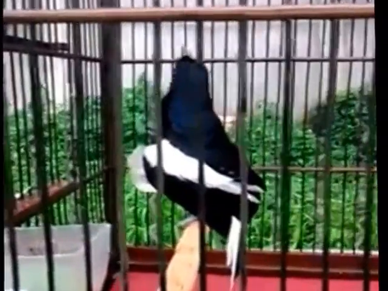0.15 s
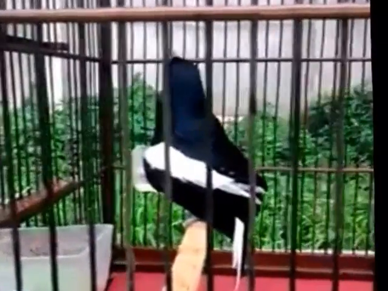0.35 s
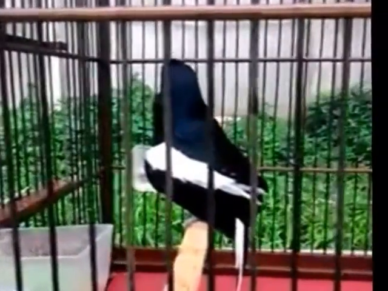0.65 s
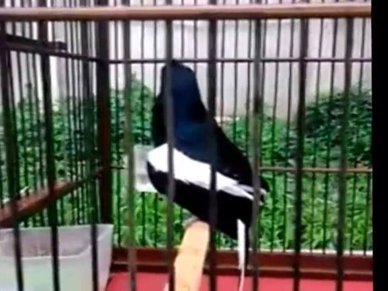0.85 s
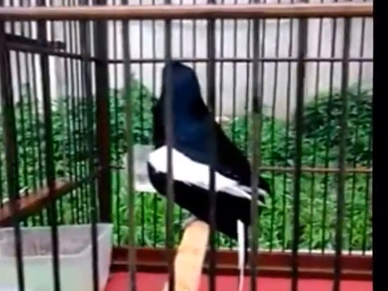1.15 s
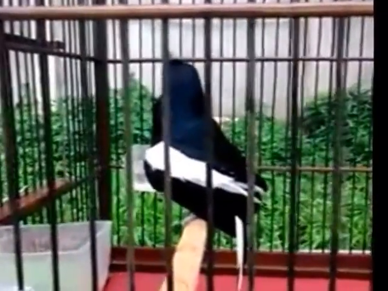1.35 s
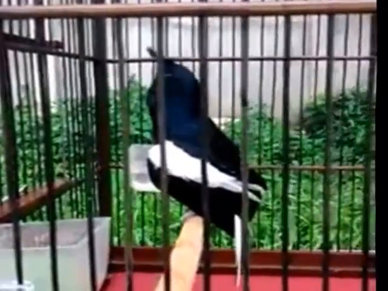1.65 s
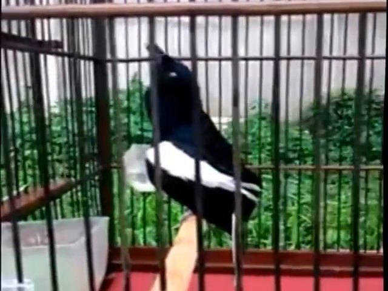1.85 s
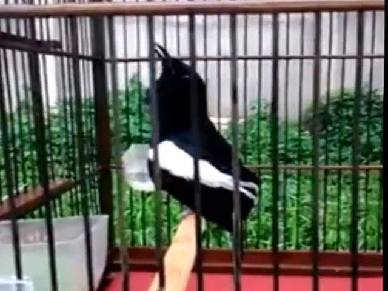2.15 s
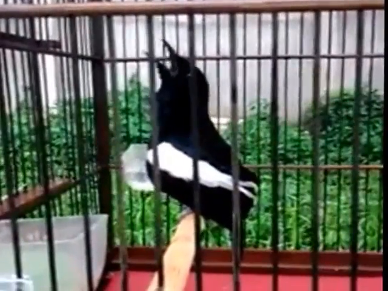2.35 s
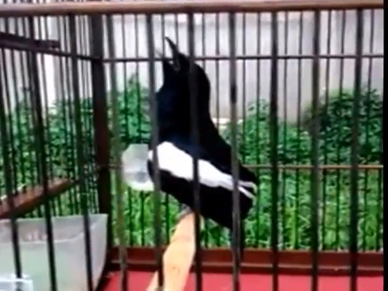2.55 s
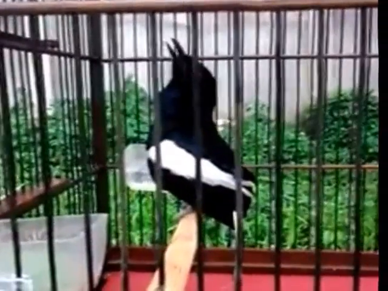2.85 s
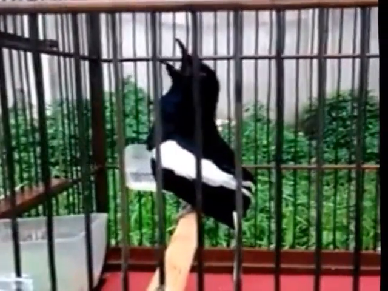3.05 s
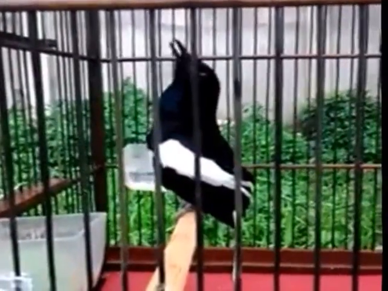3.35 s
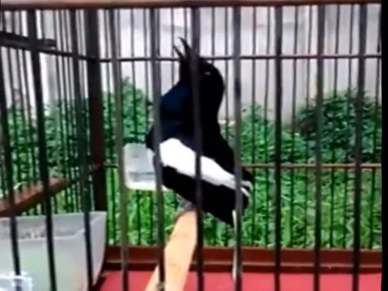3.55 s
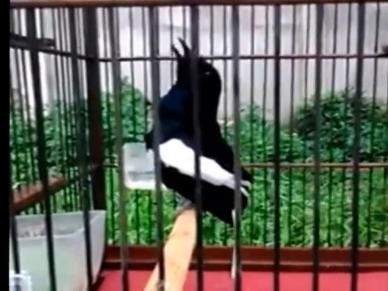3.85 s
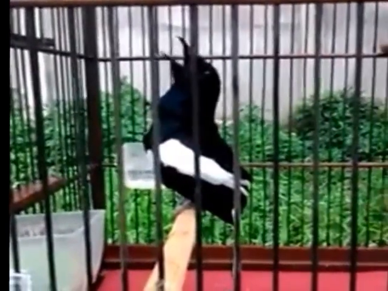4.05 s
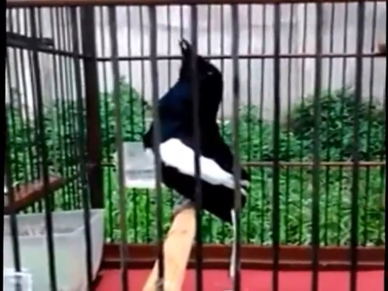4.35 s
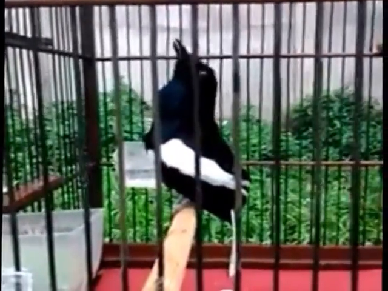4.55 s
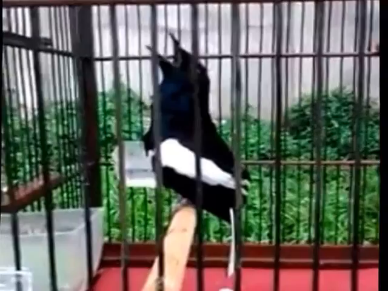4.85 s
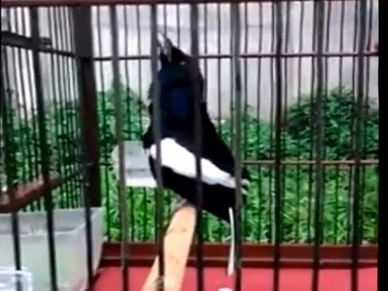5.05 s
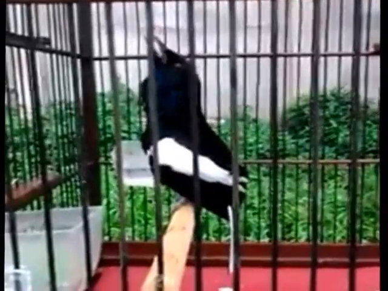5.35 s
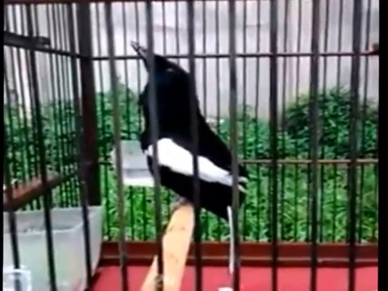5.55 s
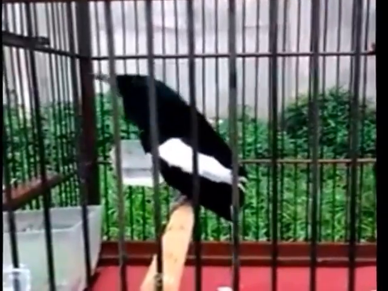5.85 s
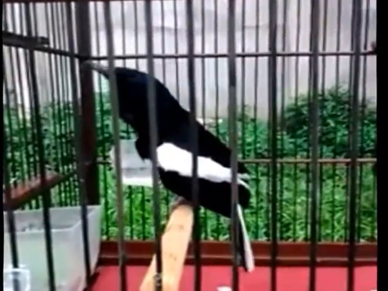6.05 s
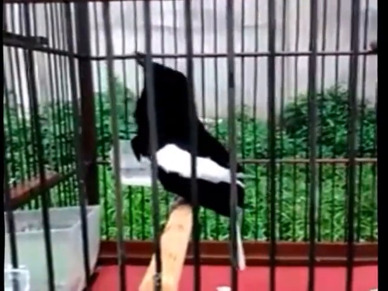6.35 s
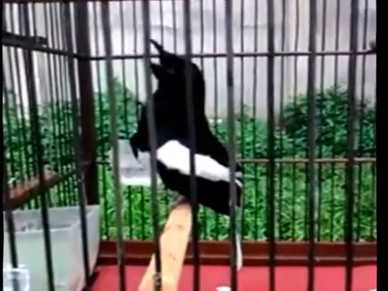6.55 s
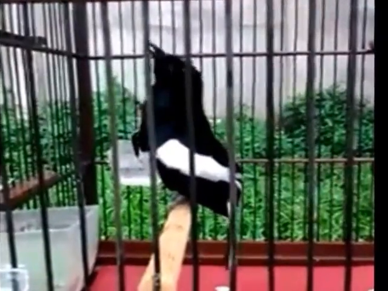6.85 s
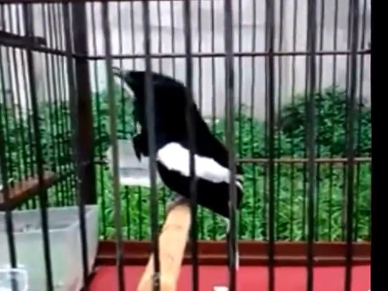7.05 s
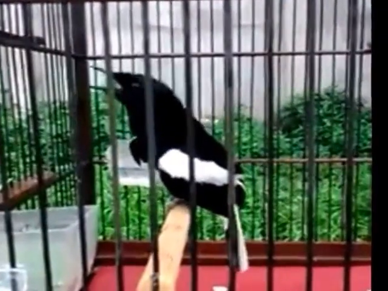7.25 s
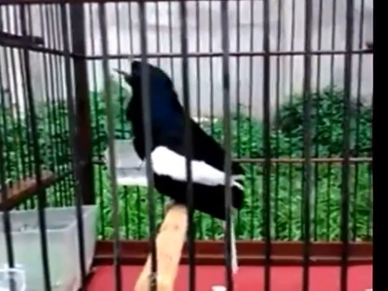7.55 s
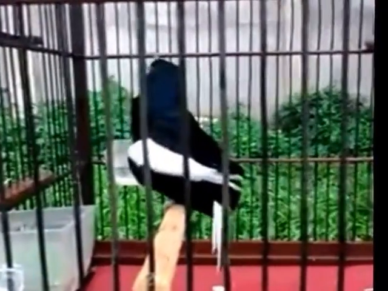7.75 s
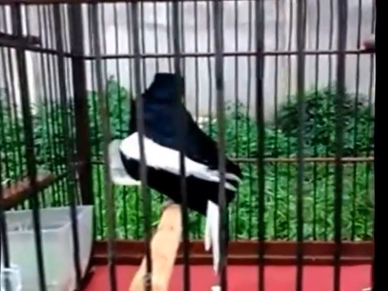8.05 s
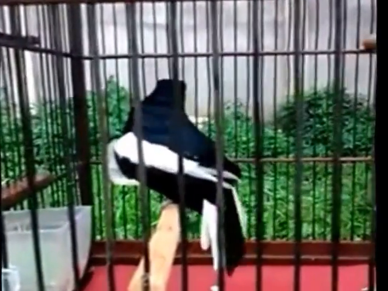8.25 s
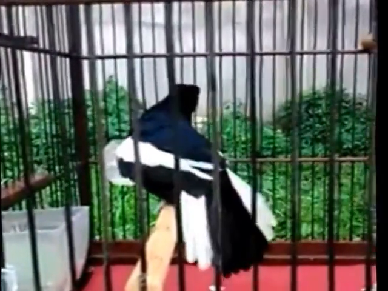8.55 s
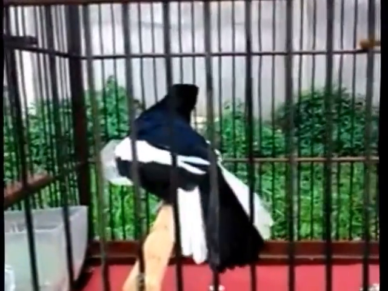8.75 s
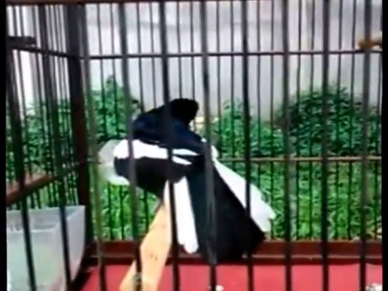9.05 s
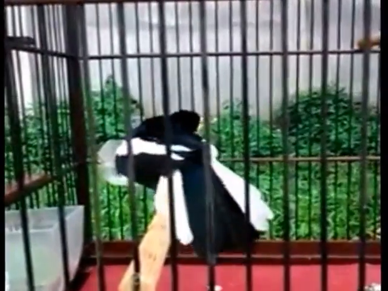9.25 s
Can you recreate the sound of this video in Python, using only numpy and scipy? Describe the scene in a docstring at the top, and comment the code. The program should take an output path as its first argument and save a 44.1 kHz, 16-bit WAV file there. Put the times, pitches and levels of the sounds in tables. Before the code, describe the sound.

Bright, rapid birdsong at close range, pure whistles breaking into raspy chips, scolding chatter and two-voiced slurs, with faint rumble and short yard echo behind.

```python
"""A caged magpie-robin sings close by, over a low rumble and airy noise, in a yard whose walls echo.
It opens with clean and drawn-out whistles, a second voice joining near 1 s, then a buzz with a husky tail (1.6 s).
From 2 s come slurs, chips, trills, warbles and stray harsh chacks; a second buzz (5.4 s) and a run of chacks (6 s)
follow; two-voiced slurs and quick trills end it. The syrinx is sines steered in pitch, level and roughness, chacks are
harmonic stacks, metallic tones are plain sines, the rest is shaped noise. Loud notes push echo and background down."""
import sys
import numpy as np
from scipy import signal
from scipy.fft import rfft, irfft, next_fast_len
from scipy.io import wavfile
from scipy.ndimage import uniform_filter1d

SR = 44100
rng = np.random.default_rng(int(sys.argv[2]) if len(sys.argv) > 2 else 0)


def log_audio(samples):
    """Write samples as a 16-bit WAV file to the path given in sys.argv[1]."""
    # one column per channel
    frames = np.atleast_2d(samples).T
    # limit to full scale, then quantise
    limited = np.clip(frames, -1, 1)
    pcm = np.round(limited * 32767).astype(np.int16)
    wavfile.write(sys.argv[1], SR, pcm)


N = 414981
TIME = np.arange(N) / SR


def amp(db):
    """Decibels to amplitude."""
    return 10 ** (np.asarray(db) / 20)


def unit(x):
    """Scales x to rms 1."""
    return x / np.sqrt(np.mean(abs(x) ** 2) + 1e-20)


def read(points, hz):
    """Reads a curve of (pitch [Hz], value) on a logarithmic pitch axis."""
    f, value = np.transpose(points)
    return np.interp(np.log(hz + 1), np.log(f + 1), value)


def curve(points):
    """Joins (time [s], value) points by straight lines over the whole scene."""
    return np.interp(TIME, *np.transpose(points))


def add(mix, start, sound):
    """Lays a sound into the mix from its start time, cut off at the end of the mix."""
    part = mix[max(round(start * SR), 0):][:len(sound)]
    part += sound[:len(part)]


def fade(n, edge_s):
    """A window with rounded ends."""
    return signal.windows.tukey(n, min(2 * edge_s * SR / n, 1))


def wander(speed_hz):
    """Random motion of rms 1, mostly slower than speed_hz."""
    size = next_fast_len(N, True)
    hz = np.fft.rfftfreq(size, 1 / SR)
    lowpass = 1 / (1 + (hz / speed_hz) ** 8)
    return unit(irfft(rfft(rng.standard_normal(size)) * lowpass, size)[:N])


def coloured(x, spectrum):
    """Filters x by a curve of (pitch [Hz], gain [dB])."""
    size = next_fast_len(N, True)
    gain = amp(read(spectrum, np.fft.rfftfreq(size, 1 / SR)))
    return irfft(rfft(x, size) * gain, size)[:N]


def noise(spectrum):
    """Noise of rms 1 with the given colour."""
    return unit(coloured(rng.standard_normal(N), spectrum))


def patchy(x, patch_db=10):
    """Makes a steady noise uneven, in small patches of time and pitch; rms 1."""
    z = signal.stft(x, nperseg=1024, noverlap=768)[2]
    patches = uniform_filter1d(rng.standard_normal(z.shape), size=7, axis=0)
    patches = unit(uniform_filter1d(patches, size=12, axis=1))
    z = z * amp(patch_db * np.minimum(patches, 1.5))
    return unit(signal.istft(z, nperseg=1024, noverlap=768)[1][:N])


RASP = 0.95  # share of scatter in the roughest voice


def sing(notes, trill_hz=62, trill_depth_hz=380, jitter_hz=180, third_db=-15, fourth_db=-23, fuzz=0.33,
         coupling=0.83, breakup=0.67):
    """Each note is a sine from the syrinx; roughness adds a trill, fast pitch jitter and a band of rasp."""
    out = np.zeros(N, complex)
    jitter, drift = wander(270), wander(25.4)
    scatter = unit(wander(520) + 1j * wander(470))
    flick = np.cos(2 * np.pi * np.cumsum(trill_hz * (1 + 0.1518 * drift)) / SR)
    flutter = flick + 0.96 * (flick ** 2 - 0.5)  # sharp upward flicks, round troughs
    for note in notes:
        s, hz, db, rough, overtone_db = np.transpose(note)
        i = np.arange(max(round(s[0] * SR), 0), round(s[-1] * SR))
        controls = hz, amp(db), np.clip(rough, 0, 1), amp(overtone_db)
        hz, level, rough, octave = (np.interp(TIME[i], s, c) for c in controls)
        rough = rough ** 3 / (rough ** 2 + 0.0067)  # a steady syrinx stays pure until it starts to break up
        treble = octave / (1 + (hz / 4600) ** 10)  # the highest notes are nearly pure
        swing_hz = trill_depth_hz * (1 - breakup * rough)  # the roughest notes lose their regular trill
        hz = hz + rough * (swing_hz * flutter[i] + jitter_hz * jitter[i]) + 4 * drift[i]
        turn = np.exp(2j * np.pi * np.cumsum(hz) / SR)
        share = RASP * rough
        hoarse = np.clip(fuzz + 2 * rough, 0, 1)  # overtones are hoarser than the note
        voice = turn * (np.sqrt(1 - share ** 2) + share * scatter[i])
        overtones = turn + amp(third_db) * turn ** 2 + amp(fourth_db) * turn ** 3
        overtones = overtones * (np.sqrt(1 - hoarse ** 2) + hoarse * scatter[-i])
        voice = voice * (1 + treble * overtones)
        # two sides that sound together also give their sum tone
        out[i] += level * voice * fade(len(i), 0.0015) * (1 + coupling * out[i])
    return out.real


def clock(length):
    """Control times through one note."""
    return np.linspace(0, length, num=120)


def loudness(t, rise, fade_db, onset_db=-22, sag=0.88, release_s=0.0026):
    """A note swells to its peak, drifts by fade_db and is let go; in dB."""
    swell = amp(onset_db) + (1 - amp(onset_db)) * np.minimum(t / rise, 1)
    release = np.clip((t[-1] - t) / release_s, 0.1, 1)
    progress = np.clip((t - rise) / (t[-1] - rise), 0, 1)
    return 20 * np.log10(swell * release) + fade_db * progress ** sag


def gesture(*controls):
    """Rows of (time [s], pitch [Hz], level [dB], roughness [0-1], overtone [dB]) that steer the syrinx."""
    return np.transpose(np.broadcast_arrays(*controls))


# Whistles that bend through three pitches. In all note tables roughness above 1 counts as 1:
# (start [s], length [s], first [Hz], middle [Hz], last [Hz], rise [s], peak [dB], fade [dB],
#  roughness [0-1], overtone [dB])
WHISTLES = [(0.132, 0.026, 2820, 3200, 3094, 0.0083, -14.5, -8, 0.15, -51),
            (0.157, 0.017, 2520, 2400, 2500, 0.0092, -38.5, -10, 0.16, -32.5),
            (0.169, 0.017, 2320, 2637, 2570, 0.0095, -14, -11, 0.03, -34.5),
            (0.314, 0.087, 2084, 2160, 1710, 0.034, -22.5, -6.5, 0.11, -32.5),
            (0.988, 0.16, 2800, 2680, 2460, 0.025, -41, -11.5, 0.4, -44),
            (1.0, 0.13, 5830, 5640, 5500, 0.047, -44, -21, 0.13, -40),
            (1.302, 0.32, 766, 695.6, 736, 0.16, -43.5, -18, 0.07, 0),
            (1.676, 0.046, 2800, 2635, 2590, 0.027, -20, -24, 0.08, -32),
            (2.306, 0.028, 3450, 3680, 3700, 0.0045, -20, -3.5, 0.14, -16),
            (2.83, 0.037, 5080, 5110, 5180, 0.0048, -30.5, 1, 0.35, -13),
            (3.469, 0.12, 5700, 4750, 4870, 0.031, -18.5, -12.5, 1.17, -11.5),
            (3.916, 0.026, 5310, 5440, 5000, 0.0018, -21.5, -29, 0.7, -60),
            (4.033, 0.074, 3510, 2970, 3070, 0.025, -17, -15.5, 0.7, -5),
            (4.526, 0.061, 1566, 2115, 1774, 0.015, -19, -8, 0.05, -33),
            (4.666, 0.038, 3904, 3727, 3490, 0.0069, -16.5, -5, 0.12, -29.5),
            (4.913, 0.18, 3330, 3368, 3402, 0.069, -15, -11, 0.03, -40),
            (5.076, 0.18, 5750, 5840, 5900, 0.1, -46.5, -20, 0.42, -48),
            (5.13, 0.19, 6500, 6610, 6770, 0.1, -45, -15, 0.17, -33),
            (5.401, 0.22, 2856, 2772, 2480, 0.1, -24, -11.5, 0.16, -34.5),
            (7.156, 0.114, 3013, 3055, 2973, 0.012, -13.5, -5, 0.07, -34),
            (7.271, 0.056, 2950, 2877, 2780, 0.006, -23.5, -4, 0.11, -31)]


def whistle(start, length, first, middle, last, rise, db, fade_db, rough, overtone_db):
    """The pitch follows one smooth arch."""
    t = clock(length)
    arch = np.polyfit([0, 0.5, 1], [first, middle, last], 2)
    hz = np.polyval(arch, t / length)
    return gesture(start + t, hz, db + loudness(t, rise, fade_db), rough, overtone_db)


# Two drawn-out clear whistles, each a list of (time [s], pitch [Hz], rms level [dB])
DRAWN_OUT = [
    [(0.555, 3050, -32), (0.565, 2454, -21), (0.579, 2285, -29), (0.647, 2549, -19.5), (0.681, 2652, -24),
     (0.711, 2554, -30.5), (0.722, 2500, -55)],
    [(0.799, 2710, -23.5), (0.809, 2426, -19), (0.825, 2318, -25), (0.867, 2321, -33.5),
     (0.979, 2226, -38.5), (1.055, 1888, -50), (1.171, 1752, -36.5), (1.247, 1742, -36),
     (1.33, 2120, -41.5)],
]
# The other side of the syrinx joins the second of them: (time [s], pitch [Hz], rms level [dB])
UPPER_VOICE = [(0.92, 3095, -50.5), (0.98, 3300, -44), (1.048, 3176, -24), (1.08, 3036, -25.5),
               (1.12, 2980, -47), (1.244, 2883, -64), (1.318, 2964, -43), (1.35, 3040, -42)]


def drawn_out(gain_db=3, rough=0.04, low_overtone_db=-25, high_overtone_db=-48, beat_db=-33):
    """Long clear whistles, purer the higher they go; two at once add a faint combination tone above."""
    curves = [np.transpose(c) for c in DRAWN_OUT + [UPPER_VOICE]]
    (low_s, low_hz, _), (s, hz, db) = curves[-2:]
    combination_hz = 2 * hz - np.interp(s, low_s, low_hz)
    curves.append((s, combination_hz, db + beat_db))
    notes = []
    for s, hz, db in curves:
        overtone_db = np.interp(hz, [1900, 2300], [low_overtone_db, high_overtone_db])
        notes.append(gesture(s, hz, db + gain_db, rough, overtone_db))  # gain_db: rms to peak
    return notes


# Slurs that swoop to a held pitch; two that overlap are the two sides of the syrinx:
# (start [s], length [s], first [Hz], held [Hz], last [Hz], swoop [s], rise [s], peak [dB], fade [dB],
#  roughness [0-1], overtone [dB])
SLURS = [(2.345, 0.13, 3990, 1520, 1387, 0.052, 0.011, -17.5, -27.5, 0.03, -28.5),
         (2.59, 0.12, 3610, 4692, 4725, 0.0054, 0.038, -16, -8, 0.08, -21),
         (4.258, 0.062, 5150, 4510, 4070, 0.0051, 0.0037, -37, 11, 0.2, -34.5),
         (4.488, 0.022, 3730, 1510, 1523, 0.0093, 0.0048, -23, -13, 0.04, -31.5),
         (4.675, 0.13, 3530, 2946, 2576, 0.021, 0.019, -23, -1, 0, -42),
         (6.799, 0.17, 6290, 4204, 4420, 0.014, 0.04, -17, -41, 0.14, -5),
         (6.9, 0.11, 4520, 3112, 3300, 0.016, 0.015, -17, -9, 0.45, -26.5),
         (7.46, 0.14, 4310, 3310, 3600, 0.032, 0.013, -24, -12, 0.04, -15),
         (7.466, 0.042, 5930, 4880, 5190, 0.015, 0.0091, -25, -7, 0.15, -11),
         (7.636, 0.082, 5030, 3750, 3823, 0.01, 0.0047, -25, -12.5, 0.06, -9.5),
         (7.638, 0.045, 5720, 5020, 5230, 0.017, 0.0046, -18.5, -12, 0.28, -9.5),
         (7.762, 0.11, 4720, 3430, 3860, 0.016, 0.0029, -27.5, -22.5, 0.22, -3),
         (7.762, 0.026, 5950, 5430, 5555, 0.0076, 0.0031, -33, 21, 0.54, -3.5),
         (7.96, 0.11, 4470, 3405, 4150, 0.0043, 0.0068, -26, -13, 0.28, -5.5),
         (8.347, 0.069, 4164, 3420, 3490, 0.035, 0.01, -20.5, -22, 0.28, -10.5),
         (8.354, 0.14, 4890, 2286, 2494, 0.032, 0.029, -19, -25.5, 0.2, -27),
         (8.908, 0.058, 3230, 2500, 2420, 0.023, 0.0077, -29, 0.5, 0.03, -21.5)]
SWOOP_ROUGH = 0.35  # extra roughness while the pitch is still swooping


def slur(start, length, first, held, last, swoop_s, rise, db, fade_db, rough, overtone_db):
    """The pitch relaxes quickly to a held value, which drifts."""
    t = clock(length)
    swoop = np.exp(-t / swoop_s)
    hz = held + (first - held) * swoop + (last - held) * t / length
    return gesture(start + t, hz, db + loudness(t, rise, fade_db), rough + SWOOP_ROUGH * swoop, overtone_db)


# Short chips, many of them raspy:
# (start [s], length [s], first [Hz], last [Hz], peak [dB], roughness [0-1])
CHIPS = [(2.107, 0.017, 3874, 3360, -16.5, 0.7), (2.729, 0.041, 3560, 4100, -24, 0.5),
         (2.774, 0.024, 4310, 5100, -23.5, 0.98), (2.781, 0.025, 4220, 5180, -21, 1.03),
         (4.229, 0.016, 3460, 4570, -29, 1.1), (4.23, 0.037, 8000, 7980, -35.5, 0.33),
         (4.247, 0.033, 6660, 6600, -35.5, 0), (4.258, 0.018, 6000, 5600, -32, .2),
         (4.353, 0.023, 3670, 3780, -21.5, 0.1), (4.322, 0.025, 4540, 4790, -30, .7),
         (4.344, 0.031, 3800, 3610, -32, 0.7), (6.275, 0.0094, 1780, 2010, -17.5, 0.03),
         (6.336, 0.02, 1760, 2200, -28, 0.1), (6.803, 0.023, 6230, 5620, -23.5, 1),
         (3.243, 0.046, 5600, 5960, -32, 0.63), (3.359, 0.043, 6530, 7200, -35, 0.2),
         (3.855, 0.037, 5840, 5750, -33.5, 0.53), (3.952, 0.024, 6100, 6270, -31.5, 0.8),
         (8.339, 0.018, 2710, 3900, -30.5, 0.5), (8.344, 0.022, 3860, 5700, -22, 0.45),
         (8.611, 0.021, 3150, 2905, -17, 0.4), (9.099, 0.015, 3280, 2940, -18.5, 0.46)]
CHIP_OVERTONE_DB = -21  # trills share it


def chip(start, length, first, last, db, rough, edge_db=-11):
    """One straight, quick sweep, loudest in the middle."""
    t = clock(length)
    u = t / length
    level = db + edge_db * (2 * u - 1) ** 2
    return gesture(start + t, first + (last - first) * u, level, rough, CHIP_OVERTONE_DB)


# Fast, deep trills: (start [s], length [s], first centre [Hz], last centre [Hz], swing [Hz],
#                     swing rate [1/s], peak [dB], roughness [0-1])
TRILLS = [(2.994, 0.054, 3013, 3785, 620, 46.4, -17, 0.26),
          (8.622, 0.043, 3384, 3550, 410, 76, -17.5, 0.25), (9.11, 0.039, 3170, 3945, 455, 79, -16, 0.22)]


def trill(start, length, first, last, swing_hz, rate_hz, db, rough, rise_s=0.01, fade_db=-9):
    """The pitch zigzags upward in swings that narrow."""
    t = clock(length)
    u = t / length
    swing = swing_hz * (1 - u / 2) * np.cos(2 * np.pi * rate_hz * t)
    hz = first + (last - first) * u - swing
    return gesture(start + t, hz, db + loudness(t, rise_s, fade_db), rough, CHIP_OVERTONE_DB)


def scratch(start, length, first, last, swing_hz, rate_hz, db, rough, lag_s=0.0062, faster=1.683, below_db=-7):
    """The other side of the syrinx shakes faster across each trill and splits its strokes."""
    return trill(start + lag_s, length - lag_s, first, last, swing_hz, faster * rate_hz, db + below_db, rough)


# Warbles that go up, down and up again:
# (start [s], length [s], time to the dip [s], first crest [Hz], dip [Hz], second crest [Hz], last [Hz],
#  peak [dB], fade [dB], overtone [dB])
WARBLES = [(3.241, 0.18, 0.11, 3064, 2893, 3450, 2840, -18.5, -16, -20),
           (3.846, 0.14, 0.1, 3020, 2690, 2960, 2380, -20.5, -7.5, -13.5),
           (4.223, .152, 0.06, 3260, 2860, 3360, 3856, -31.5, -2.5, -10.5)]
WARBLE_RISE_S, WARBLE_ROUGH, WARBLE_FRAY = 0.032, 0.067, 0.086  # fray: extra roughness at the end


def warble(start, length, dip_s, first, dip, second, last, db, fade_db, overtone_db):
    """The pitch rounds two crests with a dip between them."""
    t = clock(length)
    corners_s = [0, dip_s / 2, dip_s, (dip_s + length) / 2, length]
    turns = np.interp(t, corners_s, [(first + dip) / 2, first, dip, second, last])
    hz = uniform_filter1d(turns, size=13)
    rough = WARBLE_ROUGH + WARBLE_FRAY * (t / length) ** 4
    return gesture(start + t, hz, db + loudness(t, WARBLE_RISE_S, fade_db), rough, overtone_db)


# Buzzes that swell, hold and sink into a long husky tail:
# (start [s], rise [s], time to the tail [s], pitch [Hz], peak [dB], roughness [0-1])
BUZZES = [(1.574, 0.034, .125, 3018, -17, 0.15), (5.388, 0.067, .128, 3043, -17, 0.14)]
QUAVER_HZ, QUAVER_SWING_HZ, BUZZ_OVERTONE_DB = 51.3, 256, -28.5
TAIL_S, TAIL_PITCH_S, TAIL_ROUGH = 0.25, 0.21, 0.13  # length, time constant of the falling pitch, roughness
TAIL_DROP_DB, TAIL_DROP_S, TAIL_DB_PER_S = -23.5, 0.032, -20  # a quick drop in level, then a slow one


def buzz(start, rise, hold, hz, db, rough, stumble=0.5, grain_db=5):
    """Pitch and level hold, then sink together as the note quavers unevenly."""
    t = clock(hold + TAIL_S)
    late = np.maximum(t - hold, 0)
    slack = 1 - np.exp(-late / TAIL_DROP_S)
    slips, grains = rng.standard_normal((2, len(t)))
    drop_db = TAIL_DROP_DB + grain_db * uniform_filter1d(grains, size=3)
    level = db + loudness(t, rise, 0) + drop_db * slack + TAIL_DB_PER_S * late
    rough = rough + (TAIL_ROUGH - rough) * slack
    phase = 2 * np.pi * QUAVER_HZ * late + stumble * np.cumsum(slips)
    quaver = QUAVER_SWING_HZ * np.sin(np.pi * late / TAIL_S) * np.sin(phase)
    sinking_hz = hz * np.exp(-late / TAIL_PITCH_S)
    return gesture(start + t, sinking_hz + quaver, level, rough, BUZZ_OVERTONE_DB)


HUSK_DB, HUSK_PITCH_S, HUSK_ROUGH = 5, 0.52, 0.55  # a hoarse strand of the tail that sinks more slowly


def husk(start, rise, hold, hz, db, rough, ratio=0.99, onset_s=0.057, fade_db=-12):
    """The other side of the syrinx rasps along under the tail of a buzz."""
    t = clock(TAIL_S)
    level = db + TAIL_DROP_DB + HUSK_DB + loudness(t, onset_s, fade_db)
    sinking_hz = ratio * hz * np.exp(-t / HUSK_PITCH_S)
    return gesture(start + hold + t, sinking_hz, level, rough + HUSK_ROUGH, BUZZ_OVERTONE_DB)


# A faint high echo dies away at the start:
# (time [s], pitch [Hz], peak level [dB], roughness [0-1], overtone [dB])
AFTERSOUND = [(0, 4020, -41, 0.54, -48), (.13, 4060, -61, 0.1, -16)]


def phrases():
    """Every tonal note of the song, with the faint echo at the start."""
    kinds = [(whistle, WHISTLES), (slur, SLURS), (chip, CHIPS), (trill, TRILLS), (scratch, TRILLS),
             (warble, WARBLES), (buzz, BUZZES), (husk, BUZZES)]
    return [shape(*row) for shape, rows in kinds for row in rows] + drawn_out() + [AFTERSOUND]


# Harsh calls: (start [s], length [s], level [dB], pitch [Hz], throat resonance [Hz],
#               throat width [log ratio], place of the crest [0-1], level of the treble fizz [dB])
CHACKS = [(2.084, 0.044, -28, 774, 3770, 0.5, 0.4, -47), (4.222, 0.029, -42.5, 797, 5230, 0.75, 0.62, -67),
          (5.962, 0.031, -45, 650, 1410, 0.36, .5, -62), (6.003, .038, -32, 619, 1740, 0.21, 0.38, -51),
          (6.046, 0.058, -36, 601, 1690, 0.21, 0.48, -59.5),
          (6.212, .039, -30.5, 645, 1750, 0.59, 0.6, -50), (6.268, 0.046, -31, 632, 2030, 0.49, 0.57, -44),
          (6.338, .038, -30, 627, 2080, 0.39, 0.5, -44), (6.451, 0.045, -25.5, 658, 2490, 0.29, 0.42, -41),
          (6.512, .044, -27.5, 638, 2100, 0.35, 0.55, -40),
          (6.589, 0.04, -28, 621.5, 2100, 0.35, 0.54, -42)]
# Colour of the fizz: (pitch [Hz], relative density [dB per Hz])
FIZZ = [(3500, -40.5), (5200, -14.5), (7000, -18.5), (7900, -20), (8600, -4), (9800, -3.5), (10900, -13.5),
        (11700, -32), (14000, -48.5)]


def chacks(low_hz=1000, arch=0.254, chest_db=-2, half_lines_db=-11, throat_opening=0.32, raggedness=1.2,
           grain_db=1.94, taper=0.5):
    """A ragged, sputtering harmonic stack arches in pitch as a broad throat resonance opens and shuts.
    The odd harmonics weaken at the crest, where a burst of fizz escapes."""
    out, jitter = np.zeros(N), wander(160)
    k = np.arange(1, 18)[:, None]  # harmonic numbers
    ragged = unit(wander(110) + 1j * wander(200))
    sputter = amp(grain_db * wander(360))
    fizz = patchy(noise(FIZZ), patch_db=5)
    for s, length, db, pitch, centre, width, crest, fizz_db in CHACKS:
        i = round(s * SR) + np.arange(round(length * SR))
        progress = np.interp(np.linspace(0, 1, len(i)), [0, np.clip(crest, 0.1, 0.9), 1], [0, 0.5, 1])
        swell = abs(np.sin(np.pi * progress))
        hz = k * pitch * (1 + arch * (swell - 0.9) + 0.06 * jitter[i])
        mouth = centre * (1 + throat_opening * (swell - 0.7))
        throat = 1 / (1 + (np.log(hz / mouth) / width) ** 8)
        throat = throat + amp(chest_db) * swell / (1 + ((hz - 2 * pitch) / 200) ** 2)  # chest resonance
        partials = np.exp(2j * np.pi * (np.cumsum(hz, axis=1) / SR + rng.random(k.shape)))
        partials *= 1 + raggedness * ragged[i - k * len(i)]  # each harmonic frays on its own
        partials *= amp(half_lines_db * (k % 2) * swell ** 2)
        call = (partials.real * throat / (1 + (low_hz / hz) ** 6)).sum(0)
        push = swell ** taper * sputter[i]
        add(out, s, amp(db) * unit(call * push) + amp(fizz_db) * unit(fizz[i] * push * swell))
    return out


# First reflections from the cage floor and nearby walls: (delay [s], level [dB])
BOUNCES = [(.0031, -26), (.0074, -12.5), (0.0135, -16)]


def cage(x):
    """Near reflections beat against every quick glide."""
    out = x.copy()
    for delay, db in BOUNCES:
        add(out, delay, amp(db) * x)
    return out


# The colour that beak and microphone give the tonal notes: (pitch [Hz], gain [dB])
SONG_COLOUR = [(1000, -0.5), (5800, 0.5), (6800, -1.5), (8000, 4), (8600, -21.5), (9500, -2.5),
               (10400, 6.5), (11500, 10.5), (12500, -9), (14500, -16.5)]


def bird():
    """Coloured tonal notes and chacks, with their first reflections."""
    return cage(coloured(sing(phrases()), SONG_COLOUR) + chacks())


# The pitches at which the metallic tones ring [Hz]
RING_A, RING_B, RING_C, RING_D, RING_E = 4688, 5062, 5812, 8812, 9562
# Thin metallic tones, the last row a soft swell lingering at the pitch of the whistle near 5 s: (start [s],
# length [s], pitch [Hz], rms level [dB])
RINGS = [(0.792, 0.15, RING_A, -57.5), (0.99, 0.05, 5410, -46), (2.099, 0.025, RING_A, -25.5),
         (2.74, 0.042, RING_A, -30), (2.741, 0.0159, RING_C, -30), (2.785, 0.033, RING_C, -30),
         (2.735, 0.076, RING_D, -40), (3.256, 0.051, RING_E, -30.5), (3.315, 0.047, RING_D, -27.5),
         (3.316, 0.045, RING_C, -28), (3.497, 0.067, RING_D, -39.5), (3.856, 0.045, RING_D, -32),
         (3.967, 0.022, RING_A, -28.5), (4.98, 0.099, 7135, -51.5), (0.523, 0.12, RING_A, -52.5),
         (6.824, 0.059, RING_D, -25), (6.856, 0.069, RING_D, -37), (7.477, 0.14, RING_A, -27.5),
         (7.654, 0.086, RING_B, -33.5), (7.74, 0.05, RING_B, -43), (7.779, 0.03, RING_B, -31),
         (7.816, 0.055, RING_B, -38), (7.959, 0.016, RING_B, -25), (7.999, 0.057, RING_B, -29),
         (8.864, 0.044, RING_B, -19), (4.248, 0.013, 5220, -19.5), (4.362, 0.023, RING_A, -40),
         (5.264, 0.079, 3377, -44.5)]


def rings():
    """Thin tones of steady pitch that start and stop quickly, their level trembling slightly."""
    out = np.zeros(N)
    for s, length, hz, db in RINGS:
        t = TIME[:round(length * SR)]
        tone = np.sqrt(2) * np.sin(2 * np.pi * hz * t)
        add(out, s, amp(db) * tone * fade(len(t), 0.0052))
    return out * (1 + 0.16 * wander(65))


# Short soft hisses between the notes: (time [s], level at the crest [dB])
HISSES = [(0.523, -46.5), (1.997, -38.5), (2.23, -41.5), (2.975, -39.5), (3.639, -34.5), (3.771, -34),
          (4.225, -44), (5.825, -52), (8.137, -41), (8.255, -40), (8.485, -40.5), (8.718, -35.5),
          (8.842, -37), (0.768, -44), (4.393, -52.5), (2.469, -43.5), (2.594, -43), (2.851, -42),
          (7.118, -43.5), (8.974, -40.5)]
# Colour of the hisses: (pitch [Hz], relative density [dB per Hz])
HISS = [(600, -31), (1500, -20.5), (3200, -2.5), (5300, -3.5), (8000, -11), (10500, -4), (12500, -19.5),
        (14500, -35.5)]


def hisses(rise_s=0.016):
    """Puffs of bright noise that swell quickly and die away."""
    level, u = np.zeros(N), TIME[:SR // 4] / rise_s
    for s, db in HISSES:
        add(level, s, amp(db) * u * np.exp(1 - u))
    return level * noise(HISS)


def ducking(song, threshold_db=-46, depth=0.46, recover_db_per_s=400):
    """Gain on echo and background: falls with the song's power and comes back quickly."""
    power_db = 10 * np.log10(abs(uniform_filter1d(song ** 2, size=400)) + 1e-12)
    fall = TIME * recover_db_per_s
    held_db = np.maximum.accumulate(power_db + fall) - fall  # jumps up at once, falls at a set speed
    over_db = np.maximum(held_db - threshold_db, 0)
    return amp(-depth * uniform_filter1d(over_db, size=400))


# How long the yard rings: (pitch [Hz], time to fall by 60 dB [s])
YARD = [(500, 0.079), (3000, 0.6), (5000, 0.41), (12000, 1.87)]


def yard(x):
    """Sparse reflections of random sign, each band dying at its own speed, within about a second."""
    taps = rng.choice([-1., 1.], SR) * (rng.random(SR) < 2500 / SR) * (TIME[:SR] > 0.008)
    hz, t, z = signal.stft(taps, SR, nperseg=256)
    decay = amp(-60 * t / read(YARD, hz)[:, None])
    tail = signal.istft(z * decay, SR, nperseg=256)[1]
    return signal.fftconvolve(x, tail / np.linalg.norm(tail))[:N]


# The echo sinks and swells: (time [s], relative level [dB])
ECHO_DB = [(3.0, 1), (3.42, -4.5), (3.9, 5.5), (4.12, -4.5), (4.22, -31), (4.37, -2), (4.6, 3),
           (4.75, -6.5), (7.5, 0), (7.72, -7), (8.05, 9), (8.4, -16)]


def echo(song, tones, gain, echo_db=-8, ring_echo_db=-6, low_hz=1900, high_hz=6500):
    """The yard answers a thinned song, mostly its whistles, and the metallic tones."""
    thin = signal.butter(2, [low_hz, high_hz], "bandpass", fs=SR, output="sos")
    source = signal.sosfilt(thin, song) + amp(ring_echo_db) * tones
    return gain * amp(echo_db + curve(ECHO_DB)) * yard(source)


# Colour of the airy background: (pitch [Hz], relative density [dB per Hz])
AIR = [(300, -11.5), (700, -1.5), (1500, -4), (3200, 7), (6000, -9.5), (11000, 0), (12500, -21),
       (14500, -12.5)]
# It sinks and swells: (time [s], mean level before ducking [dB])
AIR_DB = [(0, -60.5), (.5, -51), (1.2, -61), (1.45, -48.5), (2.2, -51.5), (3.7, -48), (4.2, -60.5),
          (4.85, -56), (5.15, -69), (5.85, -49), (6.75, -60.5), (7.1, -58.5), (8.6, -48.5), (9.05, -49),
          (9.35, -69)]


def air(gain, duck=1.17):
    """Patchy noise whose level wavers and ducks under the song."""
    level = amp(curve(AIR_DB) + 2 * wander(41))
    return gain ** duck * level * patchy(noise(AIR))


# Colour of the low rumble: (pitch [Hz], relative density [dB per Hz])
RUMBLE = [(20, -12), (50, 1), (150, 3), (330, -14), (550, -23.5), (1500, -48)]
# Its course: (time [s], mean level before ducking [dB])
RUMBLE_DB = [(0, -37.5), (.55, -39.5), (.8, -42), (1.15, -58), (1.48, -40), (2.1, -46.5), (3.1, -47),
             (3.75, -44.5), (4.2, -58), (4.6, -46.5), (5.15, -66), (5.35, -44), (5.7, -54), (6.2, -42.5),
             (6.75, -49.5), (7.08, -44.5), (7.4, -51.5), (9.4, -52)]
# A dull, low swell in the background: (start [s], length [s], level at the crest before ducking [dB])
SWELL = (1.75, 0.52, -44)
# Colour of the swell: (pitch [Hz], relative density [dB per Hz])
SWELL_COLOUR = [(120, -22), (230, -8), (400, -4), (520, -37), (1200, -60)]


def rumble(gain, duck=1.0, side_db=-29):
    """Wavering low noise with one dull swell, ducked under the song; returns middle and faint side."""
    level = amp(curve(RUMBLE_DB) + wander(8.5))
    mid = level * patchy(noise(RUMBLE), patch_db=4.5)
    start, length, db = SWELL
    n = round(length * SR)
    add(mid, start, amp(db) * noise(SWELL_COLOUR)[:n] * np.hanning(n))
    ducked = gain ** duck
    return ducked * mid, amp(side_db) * ducked * level * noise(RUMBLE)


# The bird turns its head aside for one note: (middle [s], half length [s], left minus right [dB])
TURN = (7.22, .16, 1.3)


def head_turn():
    """Gain that leans the whole stereo image to the left for a moment."""
    middle, half_length, db = TURN
    return amp(db / 2 * np.exp(-((TIME - middle) / half_length) ** 4))


def scene(side_db=-26):
    """The bird straight ahead, with the yard almost in mono behind it."""
    song, tones = bird(), rings()
    gain = ducking(song + tones)
    rumble_mid, rumble_side = rumble(gain)
    mid = song + tones + hisses() + echo(song, tones, gain) + air(gain) + rumble_mid
    side = amp(side_db) * yard(mid) + rumble_side
    turn = head_turn()
    return np.array([(mid + side) * turn, (mid - side) / turn])


def suppressor(x, range_db=50, floor_db=-97, slope=0.53, most_db=22):
    """Noise suppressor: turns down bands that are very faint, or far weaker than the loudest of the moment."""
    z = signal.stft(x, nperseg=1024, noverlap=768)[2]
    power = uniform_filter1d(abs(z[0]) ** 2, size=7, axis=0)  # the left channel steers both
    power = uniform_filter1d(power, size=3, axis=1)
    band_db = 10 * np.log10(abs(power) + 1e-16)
    threshold_db = np.maximum(band_db.max(0) - range_db, floor_db)
    cut_db = np.clip(slope * (threshold_db - band_db), 0, most_db)
    return signal.istft(z * amp(-cut_db), nperseg=1024, noverlap=768)[1][:, :N]


EDGE_HZ = 14900  # top of the sound band


def record(dry):
    """The noise suppressor, then the band limit."""
    lowpass = signal.firwin(511, EDGE_HZ, window=("kaiser", 9), fs=SR)
    return signal.oaconvolve(suppressor(dry), lowpass[None], "same")


dry = scene()
out = record(dry)
log_audio(out)
```